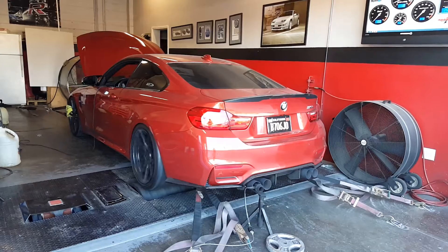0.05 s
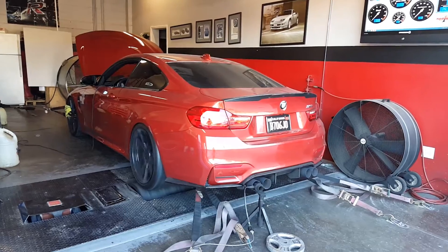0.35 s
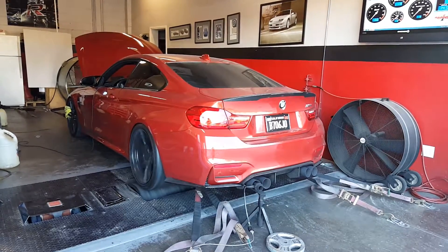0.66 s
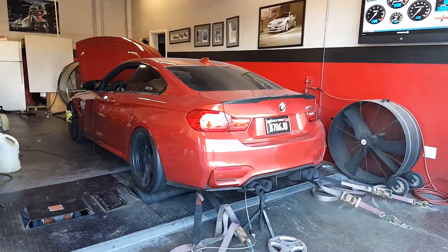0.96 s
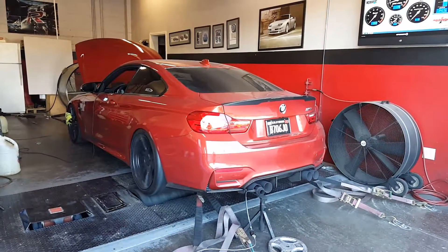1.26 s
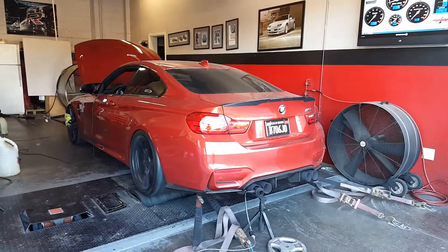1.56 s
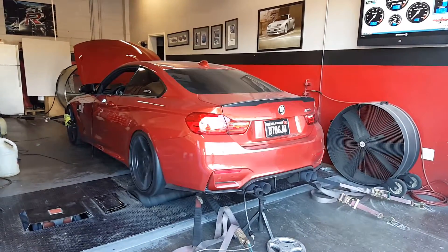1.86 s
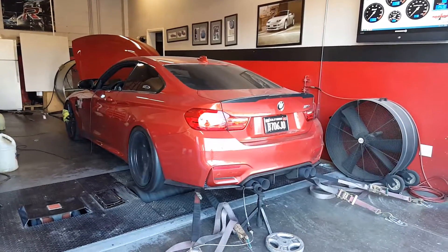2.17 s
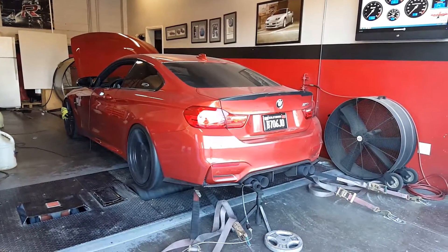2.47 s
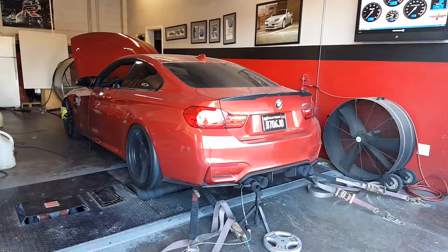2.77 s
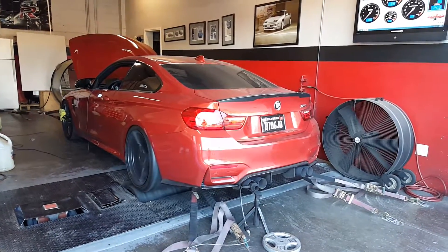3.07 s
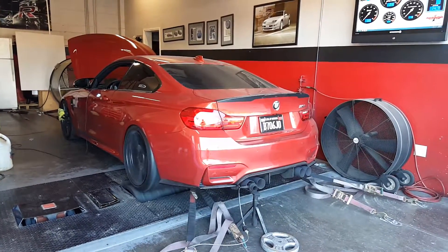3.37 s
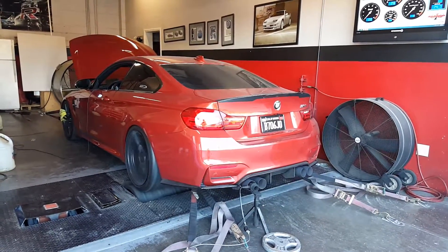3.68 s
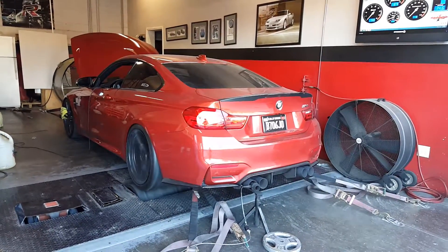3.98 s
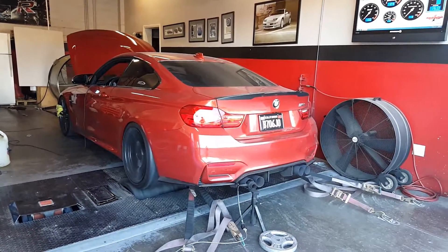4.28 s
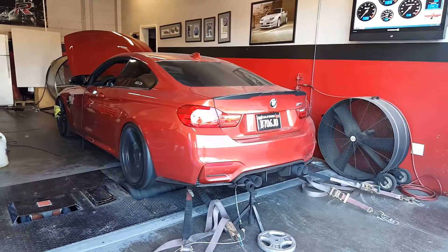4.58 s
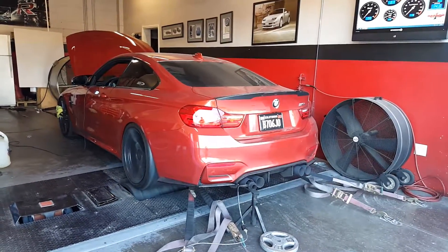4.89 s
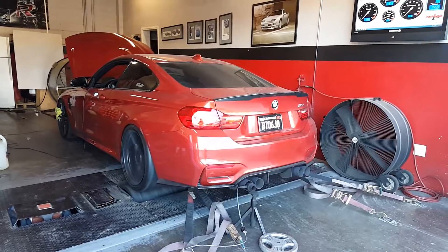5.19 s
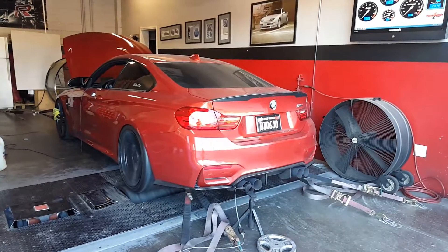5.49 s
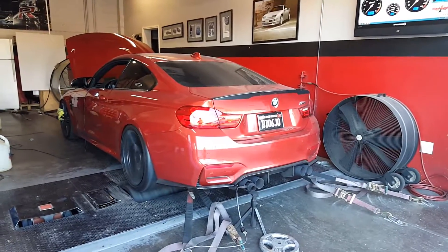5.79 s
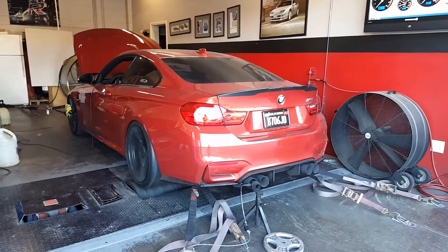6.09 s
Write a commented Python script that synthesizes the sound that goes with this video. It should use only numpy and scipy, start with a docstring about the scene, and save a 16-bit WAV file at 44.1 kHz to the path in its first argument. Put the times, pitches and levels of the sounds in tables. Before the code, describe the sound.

A turbocharged car runs on a roller dyno in a workshop, heard from behind near the exhaust. Its deep, booming drone climbs from low revs, barks briefly at the peak about halfway through, then sinks and holds at moderate revs. Underneath are a rough rush of gas, a light air hiss and a faint gear whine that rises throughout. One soft thump comes late, and the room rings slightly.

```python
"""The exhaust of a turbocharged six-cylinder car pulling gently on a workshop roller dyno, from behind.
Its firing pulses boom, climb, bark briefly at top engine speed and sink while the rollers keep gaining.
Turbulent gas roars and air hisses in time with the firings; the drivetrain's gears whine ever higher.
The shop rings along, and one soft thump comes late. Gain control ducks the mix when the boom swells."""
import sys
import numpy as np
from scipy import signal
from scipy.fft import rfft, irfft, next_fast_len
from scipy.io import wavfile
from scipy.ndimage import uniform_filter1d

SR = 44100
rng = np.random.default_rng(int(sys.argv[2]) if len(sys.argv) > 2 else 0)


def generate_wav(signal):
    """Clip the signal to [-1, 1] and save it as 16-bit WAV at the path in sys.argv[1]."""
    frames = np.transpose(np.atleast_2d(signal))
    scaled = np.clip(frames, -1, 1) * 32767
    pcm = np.round(scaled).astype(np.int16)
    wavfile.write(sys.argv[1], SR, pcm)


N = 275625
TIME_S = np.arange(N) / SR
FFT_SIZE = next_fast_len(N + SR // 2)
FREQ_HZ = np.fft.rfftfreq(FFT_SIZE, 1 / SR)

# engine speed: time_s, firing_hz
ENGINE_SPEED = [(0.25, 67.7), (0.69, 70.3), (0.98, 71.3), (1.2, 74), (1.51, 83.6), (1.76, 92),
                (2.07, 104.3), (2.49, 117), (2.79, 125.3), (2.92, 136.4), (3.22, 131.43), (3.58, 125),
                (3.75, 120.69), (4.3, 113.7), (4.84, 106.6), (5.38, 109.6), (5.92, 116.7), (6.25, 93)]
# clean exhaust tones: firing_multiple, level_db, tremble_db
BOOM_TONES = [(1, 0, 0.27), (2, -4.5, 0.64), (4, -9, 0.74)]
# pipe response to the clean tones: freq_hz, gain_db
BOOM_RESPONSE = [(66.0, -18.5), (78.0, -9.5), (110.0, -7.0), (131.0, -0.66), (160.0, -2), (225.0, -6.5),
                 (270.0, -7), (320.0, -24), (420.0, -21.5), (478.0, 3), (540.0, -5)]
# orders of the unequal cylinders: firing_multiple, level_db
CYLINDER_ORDERS = [(.5, 1), (1.5, 0), (2.5, 1.5), (3, 2), (3.5, -3), (4.5, 1), (5, -0.5), (5.5, 5),
                   (6, -7.5), (6.5, 1.5), (7, -1.5), (7.5, 3), (8, -4.5), (10, -4.5)]
# tailpipe response to those orders: freq_hz, gain_db
PIPE_RESPONSE = [(35, -66.5), (62, -43), (100, -32), (160, -29), (215, -21), (265, -36.5), (305, -44),
                 (350, -42.5), (415, -48), (480, -44.5), (620, -51), (750, -55), (1000, -56.5), (1400, -63),
                 (2400, -78.5)]
# turbulent exhaust gas: freq_hz, level_db
ROAR_SPECTRUM = [(20, -83), (45, -63), (75, -59), (130, -48.5), (230, -55), (320, -66), (500, -64.5),
                 (750, -67), (1050, -71), (1500, -75.5), (2200, -87), (4000, -110)]
# swell of the rushing air: time_s, level_db
AIR_SWELL = [(.5, -1), (.92, 2), (1.3, -2), (1.72, 0.5), (2.3, -1.7), (2.72, .8), (2.83, -1.5), (3.5, -1.5),
             (3.85, .5), (4.8, -0.5), (6.2, 1)]
# lower band of the air: freq_hz, level_db
HISS_SPECTRUM = [(1000, -21.5), (1600, -5), (2000, -4), (2450, -2.5), (3000, -8), (3800, -14),
                 (6000, -44.5)]
# upper band of the air: freq_hz, level_db
FIZZ_SPECTRUM = [(2000, -23.5), (3000, -4.5), (3800, -0.5), (4500, -4.5), (5400, -8), (6500, -10),
                 (7700, -11.5), (8900, -7.5), (10000, -15), (12500, -23.5), (15600, -27)]
# gear whine, following the rollers: time_s, pitch_hz, level_db
WHINE_TRACK = [(.5, 623, -70.5), (1.2, 757, -64.5), (1.62, 884.4, -60), (2.55, 1195, -54.5),
               (3, 1305, -64.5), (3.62, 1405, -53), (4.51, 1562, -55), (6.25, 1846, -50)]
# gear harmonics: pitch_multiple, level_db
GEAR_HARMONICS = [(1, -0.5), (2, 1), (3, -18), (4, -4.5), (6, -11.5)]
# gear housing radiation: freq_hz, gain_db
HOUSING_RESPONSE = [(1300, -4), (1750, 5.5), (2350, 0), (2900, 3), (3600, 0), (4800, 1.5), (5300, -4.5),
                    (6000, 0), (7300, -1.5), (9000, 3), (11000, -4)]
# shop resonances: centre_hz, width_hz, gain_db
SHOP_RESONANCES = [(248.5, 12, 8), (295.8, 13, 9.5), (350, 14, 10), (386.8, 33, 7.5), (478.6, 22, 6.5),
                   (543.5, 32, 7), (634, 10, 6), (685.7, 22, 7), (728.4, 28, 8.5), (807, 39, 7),
                   (915.6, 50, 7.5), (1050, 7.5, 5), (1228, 40, 9.5), (1411, 45, 7)]
# cancellations by shop reflections: centre_hz, width_hz, gain_db
SHOP_NULLS = [(71, 2.3, -9), (84.5, 2.4, -10), (95.7, 9.3, -9), (181.1, 4.2, -13), (206, 11.7, -6.5),
              (289.2, 28, -19.5), (357, 5.8, -16.5), (451.7, 28.5, -21.5), (499.1, 41.5, -25.0)]
# shop reverberation: freq_hz, t60_s
SHOP_T60 = [(100, 0.95), (500, 0.55), (2000, 0.56), (12000, 0.17)]
# left-right likeness of the noise: freq_hz, correlation
STEREO_CORRELATION = [(100, 0.93), (250, 0.97), (500, .8), (1000, 0.51), (2000, 0.0034), (8000, 0)]
# stereo balance: freq_hz, left_minus_right_db
STEREO_BALANCE = [(60, 0), (92, -2.5), (140, -2), (210, -1.5), (330, 2), (500, -5), (770, 1), (1170, -1),
                  (1790, 1.5), (2740, 4), (4190, -10.5), (6410, 3), (9810, -6), (15000, 1)]


def boom(firings, firing_hz, throttle):
    """The firing tone and two octaves swell and fade as they slide through pipe response and shop nulls."""
    unevenness = gain_of(2 * throttle)  # an open throttle burns less evenly
    octave_shift_cycles = np.interp(firing_hz, [107, 135], [.08, .38])  # the pipe shifts the phase
    tones = np.zeros(N)
    for multiple, tone_db, tremble_db in BOOM_TONES:
        pitch_hz = multiple * firing_hz
        level_db = tone_db + at_freq(BOOM_RESPONSE, pitch_hz) + bells_db(SHOP_NULLS, pitch_hz)
        level_db += tremble_db * unevenness * drift(32)
        cycles = multiple * firings + octave_shift_cycles * (multiple == 2)
        tones += gain_of(level_db) * np.cos(2 * np.pi * cycles)
    return np.sqrt(2) * tones


def exhaust(firings, firing_hz, throttle, growl_hz=300, snarl_hz=1000, knee_hz=109.26):
    """Pulses from two alternating cylinder banks growl; speed and load sharpen them to a bark and snarl."""
    jittered = firings + .004 * drift(45)
    multiples = [k / 2 for k in range(1, 44) if k / 2 not in (1, 2, 4)]  # 1, 2, 4 are the boom
    # phase k * k: the pipe spreads each pulse in time
    orders = sum(gain_of(at_freq(CYLINDER_ORDERS, k)) * np.cos(2 * np.pi * k * jittered + k * k)
                 for k in multiples)
    pulses = np.sqrt(2) * orders * puffs(firings, depth=0, scatter_db=1)
    pipe = gain_of(at_freq(PIPE_RESPONSE) + bells_db(SHOP_RESONANCES))
    low = lowpass(growl_hz, power=8)
    high = 1 - lowpass(snarl_hz, power=4)
    over_knee_hz = firing_hz - knee_hz
    bark_db = 2.5 + .1528 * over_knee_hz + .34 * np.maximum(over_knee_hz, 0) + .64 * throttle
    growl = gain_of(3.1 + 2 * throttle) * colour(pulses, pipe * low)
    bark = gain_of(bark_db) * colour(pulses, pipe * (1 - low) * (1 - high))
    snarl = gain_of(-5.5 + 1.75 * bark_db) * colour(pulses, pipe * high)
    direct = growl + gain_of(-1.43) * (bark + snarl)
    side_echo, front_echo = shop_echo(gain_of(-20.5) * growl + gain_of(-7.5) * bark + gain_of(-.5) * snarl)
    return direct + front_echo + np.array([side_echo, -side_echo])


def puffs(firings, depth, scatter_db):
    """Gas leaves in one puff per firing, each of a different strength."""
    strength_db = scatter_db * rng.standard_normal(N)
    strength = gain_of(np.interp(firings, np.arange(N), strength_db))
    return unit_rms(strength * (1 + depth * np.cos(2 * np.pi * firings)))


def gas_roar(firings, throttle):
    """Turbulence in the puffs; an open throttle pushes more gas."""
    gas = stereo_noise() * puffs(firings, depth=.37, scatter_db=1.5)
    response = gain_of(at_freq(ROAR_SPECTRUM) + bells_db(SHOP_RESONANCES))
    return gain_of(2.5 + 1.56 * throttle) * colour(gas, response) * np.sqrt(SR / 2)


def air_hiss(firings, burst_s=2.922, rise_s=.015, decay_s=.058):
    """Tailpipe air flutters with the firings and brightens with roller speed."""
    swell_db, = curves(AIR_SWELL)
    whine_hz, _ = curves(WHINE_TRACK)
    speed_octaves = np.log2(whine_hz / whine_hz.max())
    # a brief, faint, bright burst of hiss at top engine speed
    burst_age_s = np.maximum(TIME_S - burst_s, 0)
    burst = np.minimum(burst_age_s / rise_s, 1) * np.exp(-burst_age_s / decay_s)
    hiss_gain = np.hypot(gain_of(-40.5 + swell_db - speed_octaves), gain_of(-30.5) * burst)
    fizz_gain = np.hypot(gain_of(-42.5 + swell_db + 3.5 * speed_octaves), gain_of(-41.5) * burst)
    hiss = unit_rms(colour(stereo_noise(), gain_of(at_freq(HISS_SPECTRUM))))
    fizz = unit_rms(colour(stereo_noise(), gain_of(at_freq(FIZZ_SPECTRUM))))
    burst_treble = (gain_of(3.5 * burst) - 1) * colour(fizz, 1 - lowpass(5500, power=6))
    air = hiss_gain * hiss + fizz_gain * (fizz + burst_treble)
    return air * puffs(firings, depth=.081, scatter_db=.38)


def gear_whine(flutter_db=3):
    """Gear tones climb with roller speed, flutter, and radiate from the housing into the shop."""
    pitch_hz, level_db = curves(WHINE_TRACK)
    cycles = np.cumsum(pitch_hz * (1 + .0055 * drift(60))) / SR
    harmonics = sum(gain_of(db) * np.sin(2 * np.pi * k * cycles) for k, db in GEAR_HARMONICS)
    flutter = unit_rms(gain_of(flutter_db * drift(30)))
    tones = np.sqrt(2) * gain_of(level_db) * harmonics * flutter
    radiated = colour(tones, gain_of(at_freq(HOUSING_RESPONSE)))
    return gain_of(-3) * radiated + shop_echo(radiated)


def thump(centre_s=5.263, level_db=-5, length_s=.009):
    """One short, soft low thump with no ring."""
    position = np.clip(2 * (TIME_S - centre_s) / length_s, -1, 1)
    return -gain_of(level_db) * np.cos(np.pi / 2 * position) ** 2


def shop_echo(x):
    """Two diffuse half-second tails, each band dying at its own rate."""
    freq_hz, age_s, bands = signal.stft(rng.standard_normal((2, SR // 2)), SR, nperseg=256)
    decay = np.exp(-np.log(1000) * age_s / at_freq(SHOP_T60, freq_hz)[:, None])
    tails = signal.istft(bands * decay, SR)[1]
    return signal.fftconvolve(x[None], tails / np.linalg.norm(tails[0]), axes=1)[:, :N]


def stereo_noise():
    """White noise pair, alike in the bass, unrelated in the treble."""
    shared, apart = rng.standard_normal((2, N))
    correlation = np.clip(at_freq(STEREO_CORRELATION), -1, 1)
    mid = colour(shared, np.sqrt((1 + correlation) / 2))
    side = colour(apart, np.sqrt((1 - correlation) / 2))
    return np.array([mid + side, mid - side])


def drift(bandwidth_hz):
    """Slow random wander, rms 1."""
    return unit_rms(colour(rng.standard_normal(N), np.exp(-(FREQ_HZ / bandwidth_hz) ** 2)))


def bells_db(table, freq_hz=FREQ_HZ):
    """Summed bell-shaped peaks or dips."""
    return sum(db / (1 + (2 * (freq_hz - centre_hz) / width_hz) ** 2) for centre_hz, width_hz, db in table)


def at_freq(table, freq=FREQ_HZ):
    """Table lookup on a log-frequency axis."""
    knots, values = np.transpose(table)
    return np.interp(np.log(freq + 1), np.log(knots + 1), values)


def curves(table):
    """Columns of a time table, per sample."""
    time_s, *columns = np.transpose(table)
    return [np.interp(TIME_S, time_s, column) for column in columns]


def lowpass(corner_hz, power):
    """Low-pass gain per FFT bin."""
    return 1 / (1 + (FREQ_HZ / corner_hz) ** power)


def colour(x, gain):
    """Filter by a gain per FFT bin."""
    return irfft(rfft(x, FFT_SIZE) * gain, FFT_SIZE)[..., :N]


def smooth(x, window_s):
    """Running mean."""
    return uniform_filter1d(x, max(1, round(window_s * SR)))


def gain_of(db):
    """Decibels to amplitude."""
    return 10 ** (np.asarray(db) / 20)


def unit_rms(x):
    """Scale to rms 1."""
    return x / np.sqrt(np.mean(x ** 2) + 1e-20)


def scene(full_pull_hz_per_s=43):
    """One crankshaft drives all engine layers; the throttle is open while it gains speed."""
    firing_hz, = curves(ENGINE_SPEED)
    climb_hz_per_s = np.gradient(firing_hz) * SR
    throttle = smooth(np.clip(climb_hz_per_s / full_pull_hz_per_s, 0, 1), window_s=.13)
    firings = np.cumsum(firing_hz) / SR
    engine = boom(firings, firing_hz, throttle) + exhaust(firings, firing_hz, throttle)
    mix = engine + gas_roar(firings, throttle) + air_hiss(firings) + gear_whine() + thump()
    balance_db = np.outer([1, -1], at_freq(STEREO_BALANCE)) / 2
    return colour(mix, gain_of(balance_db))


def record(dry, threshold_db=-10.5, ratio=2.1, window_s=.034, fade_step_s=.01, cutoff_hz=15800):
    """Gain control, quick stepped fade-in, soft clip, band limit."""
    power = smooth(smooth((dry ** 2).mean(0), window_s), window_s)
    over_db = np.maximum(10 * np.log10(abs(power) + 1e-12) - threshold_db, 0)
    ducked = dry * gain_of(-over_db * (1 - 1 / ratio))
    stepped_s = np.round(TIME_S / fade_step_s) * fade_step_s
    faded = ducked * np.interp(stepped_s, [.225, .5], [0, 1])
    clipped = faded / (1 + abs(faded) ** 16) ** (1 / 16)
    band_limit = signal.firwin(511, cutoff_hz, window=("kaiser", 9), fs=SR)
    return signal.oaconvolve(clipped, band_limit[None], "same")


dry = scene()
out = record(dry)
generate_wav(out)
```